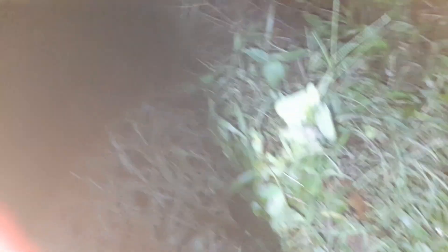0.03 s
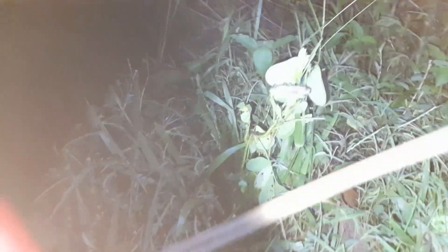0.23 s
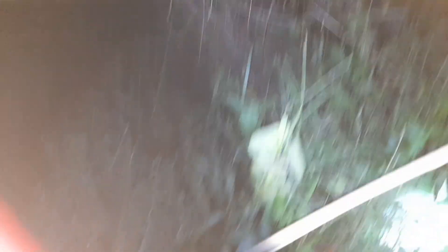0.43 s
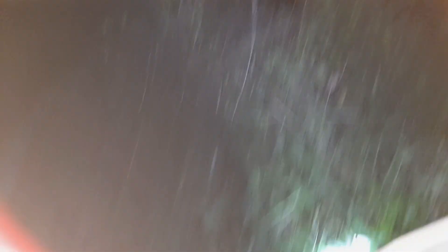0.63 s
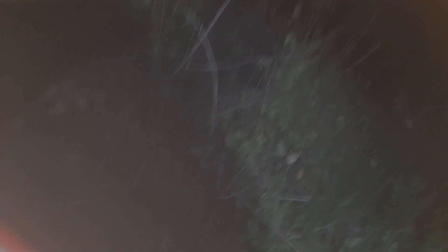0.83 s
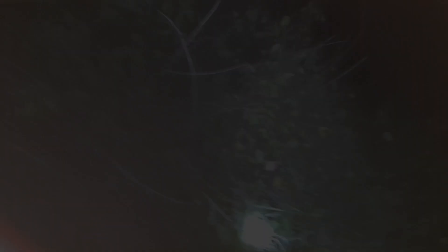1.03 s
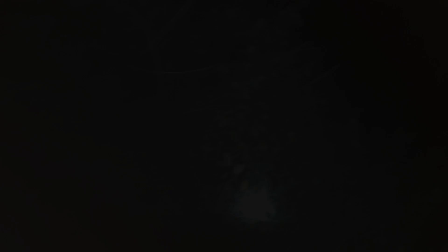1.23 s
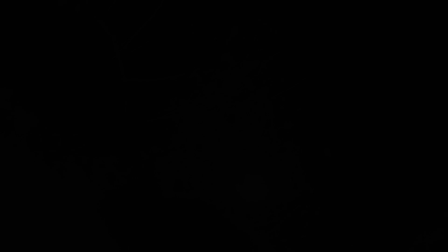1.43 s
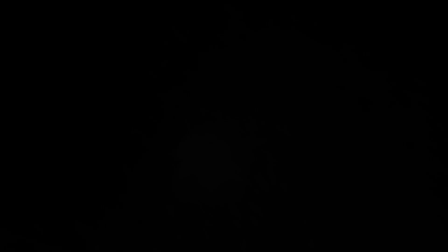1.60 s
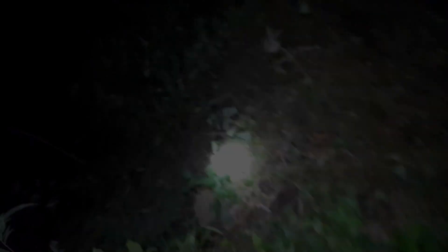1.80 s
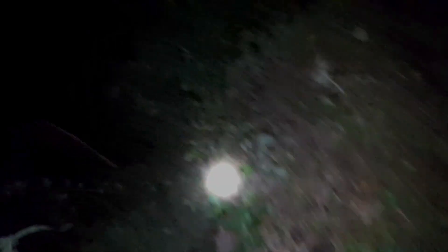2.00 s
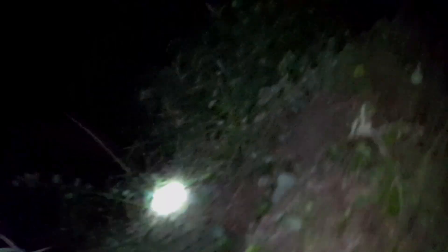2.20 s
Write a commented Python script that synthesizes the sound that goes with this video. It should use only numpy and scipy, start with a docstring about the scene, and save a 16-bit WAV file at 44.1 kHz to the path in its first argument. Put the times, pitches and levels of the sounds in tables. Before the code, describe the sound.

Outdoors at night, near crickets chirp in quick falling syllables, mostly on the left at first, over a distant trilling chorus and thin high buzz; everything fades out, then comes back fainter with light grass ticks.

```python
"""Night in the grass beside water: shaped noise gives a soft hiss, a wavering sine a low hum, and blurred runs
of falling tones a far chorus; bush crickets, as bursts on a wing resonance, buzz high above it. Near crickets
then chirp in falling syllables with echoes, stems tick as damped rings with cracks, and grainy noise rustles.
The sound fades out, is gone for a moment and fades in on a duller chorus with a higher trill."""
import sys
import numpy as np
from scipy import signal
from scipy.fft import rfft, irfft, next_fast_len
from scipy.io import wavfile
from scipy.ndimage import uniform_filter1d, map_coordinates

SR = 44100
rng = np.random.default_rng(int(sys.argv[2]) if len(sys.argv) > 2 else 0)


def materialize(psi):
    """Save the field psi as 16-bit PCM at rate SR to the path in sys.argv[1].

    A 1-D psi becomes a single channel; in a 2-D psi each row is a channel.
    """
    bounded = np.clip(np.atleast_2d(psi).T, -1, 1)
    quanta = np.round(bounded * 32767).astype(np.int16)
    wavfile.write(sys.argv[1], SR, quanta)


N = 99357
GAP_S = 1.68  # the sources change level here, while the sound is gone


def amp(db):
    """Level to amplitude ratio: 20 dB is a factor of ten."""
    return 10 ** (np.asarray(db) / 20)


def unit(x):
    """Normalise the mean power, so that the rms is 1."""
    return x / np.sqrt(np.mean(x ** 2) + 1e-20)


def clock():
    """Sampling instants: the time of every sample in seconds."""
    return np.arange(N) / SR


def along(points, hz):
    """Logarithmic frequency scale: interpolate (f/Hz, value) points on it."""
    f, value = np.transpose(points)
    return np.interp(np.log(hz + 1), np.log(f + 1), value)


def curves(rows):
    """Linear interpolation in time: one curve for each column after t/s."""
    s, *columns = np.transpose(rows)
    return [np.interp(clock(), s, column) for column in columns]


def wobble(rate):
    """Band-limited random modulation: a smooth curve through rate normal draws per second."""
    return map_coordinates(rng.standard_normal(8192), [clock() * rate], mode="wrap")


def filtered(x, response):
    """Linear filtering: the spectrum of x times a complex frequency response."""
    m = next_fast_len(N + SR // 2)
    spectrum = rfft(x, m) * response(np.fft.rfftfreq(m, 1 / SR))
    return irfft(spectrum, m)[..., :N]


def panned(x, pan_db):
    """Interaural level difference: positive pan_db makes the left side louder."""
    return x * amp([[pan_db / 2], [-pan_db / 2]])


def scattered(x):
    """Diffuse scattering by grass and bank: convolution with decaying noise, independent at each ear."""
    decay_60db_s = .19
    t = np.arange(SR // 4) / SR
    tail = rng.standard_normal((2, len(t))) * amp(-60 * t / decay_60db_s)
    wet = signal.fftconvolve(np.atleast_2d(x), tail, axes=1)[:, :N]
    return np.array([unit(side) for side in wet]) * np.std(x)


def rush(spectrum, lag_s):
    """Partly coherent stereo noise: shared and opposed parts set the likeness, a delay of the left the lag."""
    # Likeness of the two sides: f/Hz, correlation/1
    likeness = [(60, 0.66), (300, 0.87), (800, 0.93), (1300, 0.8), (2200, 0.1), (4000, 0.099),
                (12000, 0.07)]
    patchy_db, fizz_db = 2.0, 1

    # Patches of random gain in frequency and time
    cells = signal.stft(rng.standard_normal((2, N)), nperseg=512)[2]
    field = uniform_filter1d(rng.standard_normal(cells.shape[1:]), size=3, axis=0)
    field = uniform_filter1d(field, size=14, axis=1)
    pair = signal.istft(cells * amp(patchy_db * unit(field)), nperseg=512)[1][:, :N]
    pair = pair * amp(fizz_db * wobble(700))

    def mid_side_response(hz):
        angle = np.arccos(np.clip(along(likeness, hz), -1, 1)) / 2
        return amp(along(spectrum, hz)) * [np.cos(angle), np.sin(angle)]

    mid, side = filtered(pair, mid_side_response)
    left = filtered(mid + side, lambda hz: np.exp(-2j * np.pi * hz * lag_s))
    return unit(np.array([left, mid - side]))


def night_air():
    """Broadband and tonal background: the far field hisses as shaped noise, and a low sine wavers and swells."""
    # Hiss of the far field before and after the gap: f/Hz, relative level per hertz/dB
    spectrum_before = [(25, -27), (45, 1), (95, 9), (140, 8), (200, -3), (245, 6), (400, 0), (700, -0.5),
                       (1100, -3.5), (1650, -4), (2100, -1), (3500, -1), (3950, -9), (4500, 0.5),
                       (5200, 1.5), (5600, -5), (6400, -2), (7500, 0), (8150, -17), (9100, -3.5),
                       (9800, -6), (10700, 4), (12200, 7.5), (13400, 3.5), (14400, -2), (15400, -3)]
    spectrum_after = [(25, -1), (60, 14.5), (180, -5), (300, 6.5), (700, -2), (1600, -6.5), (3000, 1.5),
                      (4000, -5), (4900, 2.5), (5800, -2), (7300, 7.5), (8100, -12.5), (9000, -3),
                      (12200, -0.5), (14000, -5), (15400, -5.5)]
    # Swells of the hum: t/s, rise in level/dB, half length/s
    hum_swells = [(0.258, 2.5, .04), (0.764, 5, 0.13)]
    hiss_db, hiss_after_db = -40, -49
    lag_s, lag_after_s = 0.0003215, -0.000052  # how much later the left side hears the hiss
    hum_hz, hum_db, hum_after_db, hum_waver_db = 57.56, -57, -68, 2

    before = clock() < GAP_S
    hiss_before = amp(hiss_db) * rush(spectrum_before, lag_s)
    hiss_after = panned(amp(hiss_after_db) * rush(spectrum_after, lag_after_s), pan_db=-2.0)
    hiss = np.where(before, hiss_before, hiss_after)

    hum_phase = 2 * np.pi * np.cumsum(hum_hz + 1.0 * wobble(8.3)) / SR
    hum = unit(np.sin(hum_phase) * amp(hum_waver_db * wobble(11)))
    swell_db = sum(db * np.exp(-((clock() - s) / half_s) ** 2) for s, db, half_s in hum_swells)
    level_db = np.where(before, hum_db, hum_after_db) + swell_db
    return hiss + panned(hum * amp(level_db), pan_db=-5.0)


def far_crickets():
    """Frequency-modulated pulse trains: repeated falling syllables, blurred by scattering over distance."""
    # Far chirpers: f/Hz, fall/Hz, mean syllable rate/Hz, level before the gap/dB, level after it/dB
    chirpers = [(5300, 600, 37, -60.5, -67.5), (5004, 600, 31, -61, -64.5), (6550, 840, 42, -66, -72.5),
                (7150, 110, 63, -62, -70), (7790, 500, 61, -78.5, -69.5)]
    out = np.zeros((2, N))
    for hz, fall_hz, rate, db, after_db in chirpers:
        u = (np.cumsum(rate * (1 + .1 * wobble(12))) / SR + rng.random()) % 1  # place within a syllable
        tone = np.sin(2 * np.pi * np.cumsum(hz - fall_hz * u + 40 * wobble(60)) / SR)
        song = unit(tone * np.sin(np.pi * u) ** 2 * amp(0.76 * wobble(5.1)))
        out += scattered(song) * amp(np.where(clock() < GAP_S, db, after_db))
    return out


def wing_buzz(hz, rate, stroke_s):
    """Stridulation: each wing stroke excites the wing resonance, rippled by file teeth; a backstroke follows."""
    backstroke_db, backstroke_turn = -7, .24  # delay as a part of the stroke cycle
    tooth_hz, tooth_depth, stroke_spread_db = 1440, 0.28, 1.4

    turns = np.cumsum(rate * (1 + 0.0025 * wobble(8))) / SR + .6
    # Each stroke has its own random size and starting phase
    size, start = rng.standard_normal((2, 1024))[:, turns.astype(int) % 1024]
    t = (turns % 1 - .5) / rate
    stroke = np.exp(-(t / stroke_s) ** 2)
    backstroke = amp(backstroke_db) * np.exp(-((t - backstroke_turn / rate) / stroke_s) ** 2)
    teeth = 1 + tooth_depth * np.cos(2 * np.pi * tooth_hz * t)
    resonance = np.sin(2 * np.pi * (np.cumsum(hz) / SR + 0.15 * start))
    return unit((stroke + backstroke) * teeth * amp(stroke_spread_db * size) * resonance)


def bush_crickets():
    """Amplitude-modulated wing resonances: a steady buzzer on the right, a more uneven one on the left."""
    # Nearest bush cricket, on the right: t/s, wing resonance f/Hz, level/dB
    buzzer = [(0, 12200, -64), (.13, 12130, -59), (.34, 12100, -46.5), (.45, 12100, -72), (.58, 11830, -51),
              (.76, 12100, -62), (.87, 12290, -51), (1.02, 12270, -47.5), (1.12, 12330, -50.5),
              (1.33, 12330, -48.5), (1.43, 12350, -44), (1.62, 12240, -48.5), (1.69, 12300, -71.5),
              (1.82, 12200, -61), (1.96, 12250, -69.5), (2.02, 12040, -58), (2.06, 12400, -66.5),
              (2.25, 12250, -80)]
    # Second bush cricket, on the left: t/s, wing resonance f/Hz, level/dB
    rasper = [(0, 12310, -56), (.16, 12170, -55), (.35, 11960, -60), (.62, 11980, -56), (.8, 12030, -60),
              (1.0, 12050, -60), (1.62, 11850, -55.5), (1.69, 12000, -68), (1.96, 12100, -69),
              (2.015, 11920, -56.5), (2.06, 11800, -68), (2.25, 11820, -72)]
    waver_db = 1
    strokes_hz, stroke_s, pan_db, scatter_db = 101.9, .0011, -2, -2
    rasp_strokes_hz, rasp_stroke_s, rasp_pan_db, rasp_scatter_db = 88.6, .001, 6, -4.5

    hz, db = curves(buzzer)
    right = amp(db + waver_db * wobble(25.0)) * wing_buzz(hz, strokes_hz, stroke_s)
    hz, db = curves(rasper)
    uneven_rate = rasp_strokes_hz * (1 + .12 * wobble(50))
    left = amp(db + waver_db * wobble(6.7)) * wing_buzz(hz, uneven_rate, rasp_stroke_s)

    right_field = panned(right, pan_db) + amp(scatter_db) * scattered(right)
    left_field = panned(left + amp(rasp_scatter_db) * scattered(left), rasp_pan_db)
    return right_field + left_field


def grass():
    """Friction noise: shaped noise with a rapid random gain gives a faint, grainy rustle that comes and goes."""
    # Spectrum of the rustle: f/Hz, relative level per hertz/dB
    rustle_spectrum = [(100, -29.5), (700, -6), (1250, 6.5), (1600, -0.5), (2500, -6), (6000, -35),
                       (15000, -29)]
    # Course of the rustle: t/s, level/dB
    rustle_course = [(0, -75), (.9, -64.5), (1.15, -59), (1.6, -52), (1.75, -80.5), (1.87, -81),
                     (1.9, -59.5), (2.25, -61.5)]
    grain_db = 3.5
    db, = curves(rustle_course)
    noise = filtered(rng.standard_normal((2, N)), lambda hz: amp(along(rustle_spectrum, hz)))
    return amp(db) * unit(noise * amp(grain_db * wobble(200)))


def near_crickets():
    """Frequency glide: each wing closure is a tone that swells as its pitch falls, then two delayed echoes."""
    # Syllables of the nearer crickets: t/s, starting pitch f/Hz, level/dB, left-right difference/dB
    syllables = [(.119, 5120, -46.5, 13), (0.153, 5150, -42.5, 11), (.189, 5230, -42, 14),
                 (.226, 5100, -50.5, 13), (.350, 5110, -41, 9), (.388, 5120, -44.5, 12),
                 (0.422, 5130, -43.5, 12), (.787, 5100, -51, -2), (.825, 5310, -46, 6),
                 (.947, 5300, -51.5, -9), (.988, 5180, -49.5, 0.5), (1.026, 5360, -45.5, 1),
                 (1.04, 6540, -48, -4.5), (1.108, 6560, -48.5, -7), (1.152, 5120, -54.5, -7),
                 (1.181, 6400, -54, -7.5), (1.260, 6400, -48, -3.5)]
    syllable_s, fall_hz = .021, 626
    echo_s, echo_db, late_echo_s, late_echo_db, scatter_db = .0105, -7, .021, -12, -8

    out = np.zeros((2, N))
    for s, hz, db, pan_db in syllables:
        u = np.clip((clock() - s) / syllable_s, 0, 1)
        tone = np.sin(2 * np.pi * np.cumsum(hz - fall_hz * u ** 1.2) / SR)
        swell = np.sin(np.pi * u) ** 2
        out += panned(amp(db + 2.4 * wobble(450)) * swell * tone, pan_db)

    def echo_response(hz):
        early = amp(echo_db) * np.exp(-2j * np.pi * hz * echo_s)
        late = amp(late_echo_db) * np.exp(-2j * np.pi * hz * late_echo_s)
        return early + late

    return out + filtered(out, echo_response) + amp(scatter_db) * scattered(out)


def ticks():
    """Impulsive contact: a damped ring of a few cycles with a dry noise crack centred above its pitch."""
    # Ticks of stems and soft knocks: t/s, pitch f/Hz, level/dB, decay/s, crack relative to ring/dB
    contacts = [(0.5524, 2166, -38.5, 0.00087, -3), (.5955, 2340, -45, 0.0006, -4),
                (0.736, 1860, -47, 0.00064, -9), (.8728, 570, -33, .0012, -13),
                (.8775, 470, -42, .0025, -12), (.876, 94.6, -47, .007, -15), (1.031, 2050, -45, 0.0016, -4),
                (1.1346, 2200, -42, 0.002, -5), (1.892, 1490, -49, .001, -1),
                (1.923, 2480, -47, 0.00037, 2), (2.112, 1650, -48, 0.0011, -9),
                (2.138, 1116, -43, 0.00085, -3), (2.148, 1110, -38.5, 0.00028, -6),
                (2.153, 900, -51, 0.0012, -4), (2.188, 544, -50.5, .0017, 3),
                (2.209, 550, -51.5, 0.0018, -3), (2.234, 1300, -51.5, .001, -3)]
    crack_s = .0007
    out = np.zeros(N)
    for s, hz, db, decay_s, crack_db in contacts:
        t = np.maximum(clock() - s, 0)
        envelope = (t / decay_s) * np.exp(1 - t / decay_s)
        ring = envelope * np.sin(2 * np.pi * hz * t) * amp(2 * wobble(900))
        noise = unit(filtered(rng.standard_normal(N), lambda f: f / hz / (1 + (f / (2 * hz)) ** 3)))
        crack = noise * (t > 0) * np.exp(-t / crack_s)
        out += amp(db) * (ring + amp(crack_db) * crack)
    return out


def scene():
    """Superposition: the pressures of air, insects, grass and ticks add."""
    return night_air() + far_crickets() + bush_crickets() + grass() + near_crickets() + ticks()


def record(dry):
    """Gain and band limitation: the level fades out and in, and a steep low-pass removes the top."""
    # Fade out and in: t/s, gain/dB
    fade = [(0, 0.5), (.8, 0), (1.0, -2), (1.25, -7), (1.42, -11), (1.6, -21), (1.64, -33.5), (1.66, -100),
            (1.69, -100), (1.7, -49), (1.77, -46), (1.81, -29), (1.85, -20.5), (1.882, -19), (1.889, -14),
            (1.95, -14), (1.985, -5), (2.1, -6.5), (2.17, -3), (2.25, -2.5)]
    top_hz = 15480
    gain_db, = curves(fade)
    return filtered(dry * amp(gain_db), lambda hz: .5 - .5 * np.tanh((hz - top_hz) / 40))


dry = scene()
out = record(dry)
materialize(out)
```